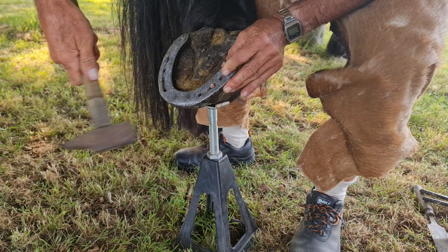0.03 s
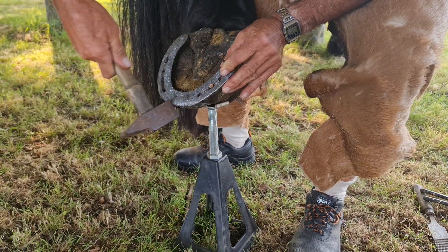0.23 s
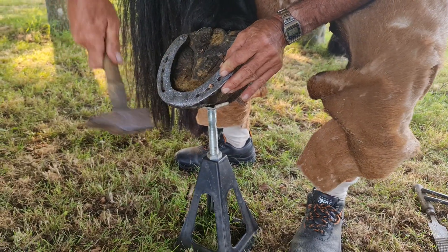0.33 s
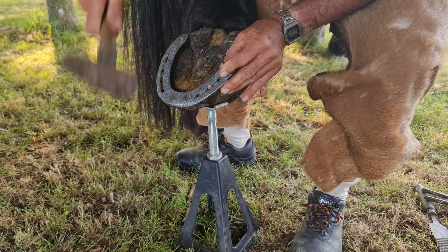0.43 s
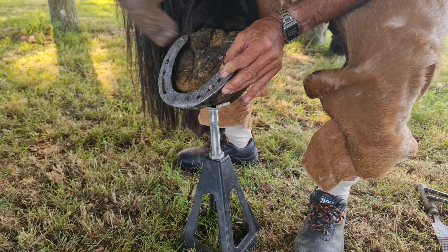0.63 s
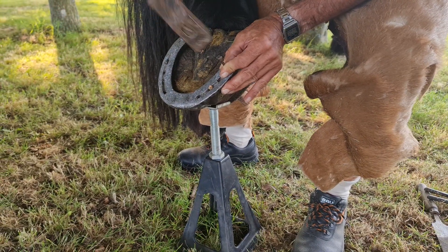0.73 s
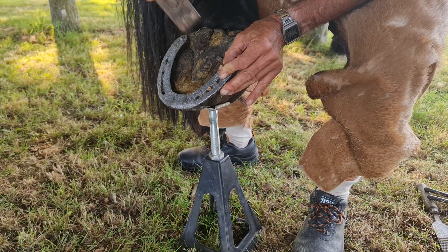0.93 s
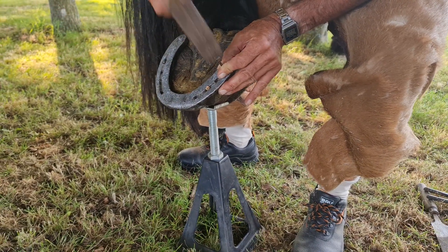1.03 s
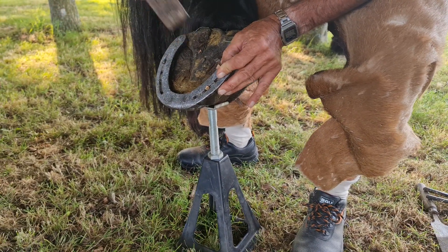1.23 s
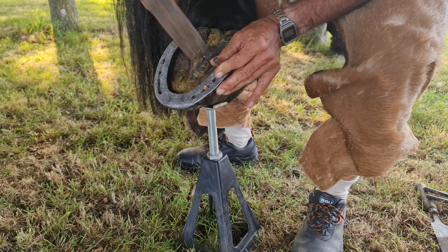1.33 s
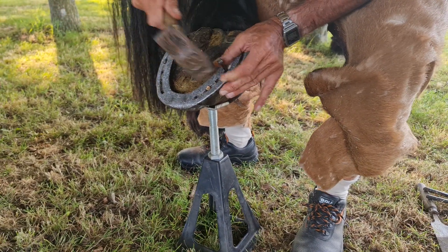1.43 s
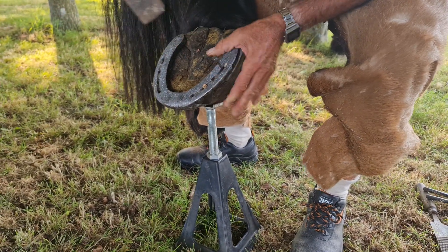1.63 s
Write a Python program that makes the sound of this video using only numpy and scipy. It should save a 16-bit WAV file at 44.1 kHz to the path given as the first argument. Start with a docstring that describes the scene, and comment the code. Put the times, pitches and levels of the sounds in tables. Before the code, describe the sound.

A hammer strikes a steel horseshoe with one sharp, briefly ringing clink. After a pause it gives a dry double tap on a nail, then a dull knock on the hoof, close to the microphone outdoors.

```python
"""Farrier at work on grass

Outdoors, close to the microphone, a shod hoof rests on a stand. As an earlier clink dies away,
the hammer clinks on the steel shoe, gives a dry double tap on a nail, then a dull knock on the hoof.
Trees answer faintly; behind are the hum of a far engine and a thin hiss of insects."""
import sys
import numpy as np
from scipy import signal
from scipy.fft import rfft, irfft
from scipy.io import wavfile
from scipy.ndimage import map_coordinates

SR = 44100
rng = np.random.default_rng(int(sys.argv[2]) if len(sys.argv) > 2 else 0)


def pcm_store(signal):
    """Save signal as 16-bit PCM."""
    levels = np.round(np.clip(np.atleast_2d(signal), -1, 1) * 32767)
    wavfile.write(sys.argv[1], SR, levels.astype(np.int16).T)


N = 74970
T = np.arange(N) / SR
HZ = np.fft.rfftfreq(N, 1 / SR)

CLINK_S, KNOCK_S = 0.2255, 1.437
NOTE_HZ, NOTE_PAN_DB = 6468, -6.5  # the shoe's main note; pan is always left minus right
BLOW_ALIKE, TREES_ALIKE = 0.05, 0.2  # likeness of left and right


def clinks():
    """Steel on steel, close up: a crack, modes choked by the contact, then a weak, rough free ring."""
    # Hammer blows. Each row: start in seconds after the main clink, level in dB,
    # extra gain of the main note in dB, treble loss in dB an octave.
    blows = [(-.35, 3, -10, 6.5), (0, -0.5, -1, -0.5)]
    # Modes of shoe and hammer head. Each row: pitch in Hz, level in dB, pan in dB,
    # t60 in contact in seconds, level of the free ring in dB.
    steel = [(1232, -22.5, -1, 0.03, -56), (2309, -27.5, 1.5, 0.042, -44.5), (2830, -22.5, 9, .028, -44.5),
             (2950, -16.5, 11, 0.025, -45), (3848, -16.5, 9.5, .03, -46), (4566, -13, 1, 0.035, -37),
             (5027, -21, -1.5, .022, -48.5), (6620, -16.5, -5, .028, -38.5), (6720, -10.5, -9.5, 0.03, -46),
             (7680, -33, -2.5, .03, -47), (7990, -28.5, -2, .03, -48), (9690, -21, -9, .017, -49.5),
             (9800, -30.5, -8.5, .02, -51.5), (10900, -31.5, -3.5, 0.042, -53.5),
             (11800, -31, -4, 0.05, -49), (12460, -27.5, 4, 0.096, -42)]
    # The contact's crack. Each row: band in Hz, level in dB, t60 in seconds, pan in dB.
    crack_bands = [(63.6, -37.5, .16, -5), (215, -35.5, 0.046, -1), (465, -43.5, 0.067, 0),
                   (930, -16, 0.031, 0.5), (2000, -16, .018, 10.5), (5260, -15, .022, -2.5),
                   (10100, -26, .02, -4), (14930, -29.5, .012, 3)]
    # Wash of the shoe's many weak modes. Each row: band in Hz, level in dB, t60 in seconds, pan in dB.
    wash_bands = [(700, -62, .15, 0.5), (1300, -47, .22, -1), (2300, -44.5, .28, -1.5),
                  (3085, -42, 0.33, -0.5), (5000, -45.5, .3, -2), (7500, -48, 0.29, -2),
                  (10000, -50, 0.16, -2), (12300, -44.5, 0.19, -0.5), (13240, -72, .15, -2)]
    ring_spectrum = sum(amp(free_db) * cluster(hz) for hz, *_, free_db in steel)
    choked = sum(-(-1) ** k * mode(hz, db, pan_db, t60)
                 for k, (hz, db, pan_db, t60, _) in enumerate(steel))
    out = 0
    for start, db, note_db, loss_db in blows:
        hit = crack(crack_bands, spike=0.31) + choked
        hit += mode(NOTE_HZ, note_db - 6.5, NOTE_PAN_DB, t60=0.067)
        hit += mode(hz=42.6, db=-36.5, pan_db=-5.5, t60=0.077)  # leg and stand shake
        wash = burst(wash_bands, BLOW_ALIKE)
        ring = np.linalg.norm(ring_spectrum) * noise(ring_spectrum) * fade(0.3)
        note = noise(cluster(NOTE_HZ, width_hz=39)) * fade(0.45)
        note *= amp(note_db - 42.5) * pan(NOTE_PAN_DB)
        clink = outdoors(hit, wet_db=-16) + wash + ring + note
        out += amp(db) * at(CLINK_S + start, dulled(clink, loss_db))
    return out


def swell():
    """The ring swells in just ahead of the main clink."""
    # Bands of the swell. Each row: centre in Hz, level in dB, pan in dB, width in octaves.
    bands = [(1150, -45, 11.5, 0.24), (2910, -29.5, 15, 0.11), (4800, -33.5, -10.5, 0.33),
             (6520, -30.5, -15.5, 0.044), (10000, -43.5, -2, 0.25)]
    lead_s = 0.0015
    ring = sum(amp(db) * pan(pan_db) * noise(bell(hz, octaves)) for hz, db, pan_db, octaves in bands)
    rising = (ring * fade(0.04))[:, ::-1]
    return at(CLINK_S - lead_s - N / SR, rising)


def taps():
    """The hammer touches a nail, snaps on it and bounces more softly."""
    # Contacts with the nail. Each row: start in seconds, snap level in dB, hoof thump in dB,
    # the snap's treble loss in dB an octave.
    contacts = [(1.111, -21.5, -22.5, -2.5), (1.1138, -1, -21.5, 1.5), (1.122, -8, -10, 3)]
    # The nail's snap. Each row: band in Hz, level in dB, t60 in seconds, pan in dB.
    snap_bands = [(246, -47, 0.15, -6), (1090, -46.5, 0.11, -1), (2500, -39, 0.03, 3),
                  (3900, -40, 0.054, 8.5), (5300, -32.5, 0.024, -3), (8600, -35, 0.03, -2),
                  (14500, -27, 0.061, -2.5)]
    blows = 0
    for start, db, thump_db, loss_db in contacts:
        snap = amp(db) * dulled(crack(snap_bands, spike=1.53), loss_db)
        blows += at(start, snap + hoof(thump_db, dull_db=5))
    return outdoors(blows, wet_db=-19)


def knock():
    """A firm, dead blow on the hoof barely wakes the shoe and leaves a nail ringing thinly."""
    # The blow's smack. Each row: band in Hz, level in dB, t60 in seconds, pan in dB.
    smack_bands = [(253, -42.5, 0.059, 7), (900, -25.5, 0.027, 4), (2000, -31, 0.033, 8),
                   (3850, -31, 0.031, 6.5), (5140, -27.5, 0.025, -8.5), (8500, -30, 0.021, 3.5),
                   (14560, -26.5, 0.066, -1)]
    blow = crack(smack_bands, spike=1.74) + hoof(db=-2)
    blow += mode(NOTE_HZ, -37.5, NOTE_PAN_DB, t60=0.072)  # the shoe, choked by the hand
    nail = amp(-50.5) * pan(1.5) * noise(cluster(hz=12300)) * fade(0.38)
    return at(KNOCK_S, outdoors(blow, wet_db=-20.5) + nail)


def hoof(db, dull_db=0):
    """The hoof thumps on its stand; a soft blow loses dull_db an octave above the lowest mode."""
    # Modes of hoof and stand. Each row: pitch in Hz, level in dB, pan in dB, t60 in seconds.
    modes = [(97.4, -31.5, 1, 0.2), (201.4, -31.5, 5.5, 0.072), (290, -33.5, -11, 0.057),
             (495, -17.5, 3, 0.038), (564, -25.5, -7.5, 0.031), (745, -22.5, 2, 0.035),
             (1074, -18.5, 16.5, 0.025)]
    lowest_hz = modes[0][0]
    return sum(mode(hz, db + level_db - dull_db * np.log2(hz / lowest_hz), pan_db, t60)
               for hz, level_db, pan_db, t60 in modes)


def rustles():
    """Hand and hammer brush the hoof."""
    # Small brushes. Each row: peak time in seconds, half-length in seconds, centre in Hz,
    # width in octaves, level in dB.
    brushes = [(0.582, 0.0084, 273, 0.32, -61), (.585, 0.0067, 1330, 0.8, -66), (.72, 0.011, 8000, .6, -82),
               (1.206, 0.12, 1020, 0.6, -66.5), (1.213, .06, 407, 0.91, -68.5),
               (1.235, .025, 8950, 0.98, -70), (1.246, .002, 8800, .5, -63), (1.27, 0.21, 5330, 0.9, -79),
               (1.478, .03, 5210, 0.31, -70.5), (1.57, .03, 100.3, 0.23, -61.5),
               (1.623, 0.019, 158, 0.25, -61), (1.7, .035, 6500, 1, -75), (1.7, 0.054, 900, 1, -75)]
    out = 0
    for peak_s, half_s, hz, octaves, db in brushes:
        envelope = np.exp(-((T - peak_s) / half_s) ** 2)
        out += amp(db + 2 * wobble(96)) * envelope * noise(bell(hz, octaves))
    return out


def outdoors(blow, wet_db):
    """A blow, its onset eased, with the scatter of near trees and a faint echo from a far row."""
    # Scatter off trees and ground. Each row: band in Hz, relative level in dB, t60 in seconds, pan in dB.
    trees = [(200, -28.5, .12, 1), (600, -23, .12, -1.5), (1400, -14.5, .22, -1), (2860, -10.5, .22, -12.5),
             (5500, -6.5, 0.28, 3.5), (10500, -4.5, .22, -0.5), (15000, -3, 0.067, -2)]
    onset_s, build_s, echo_s, echo_db = 0.00035, 0.008, 0.235, -35.5
    rise = 1 - np.exp(-(T / build_s) ** 2)
    near = burst(trees, TREES_ALIKE) * rise
    far = at(echo_s, noise(bell(hz=3700, octaves=0.2), TREES_ALIKE) * fade(0.35) * rise)
    tail = near / np.linalg.norm(near[0]) + amp(echo_db) * far / np.linalg.norm(far[0])
    blow = blow * (1 - np.exp(-T / onset_s))
    return blow + amp(wet_db) * signal.fftconvolve(blow, tail, axes=1)[:, :N]


def engine():
    """A far engine hums, wavering in pitch and level as it fades."""
    # Partials of the hum. Each row: pitch in Hz, starting level in dB.
    partials = [(64.6, -58.5), (129.2, -73.5), (196, -82)]
    fall_db_per_s, waver_db = 6, 6
    phase_drift = wobble(25)
    hum = 0
    for hz, db in partials:
        rms = amp(db - fall_db_per_s * T + waver_db * wobble(18))
        hum += rms * np.sqrt(2) * np.sin(2 * np.pi * hz * T + phase_drift * hz / partials[0][0])
    return pan(-1.5) * hum


def air():
    """Still open air: a low rumble under a faint hiss."""
    # Spectrum of the air. Each row: frequency in Hz, relative density in dB.
    spectrum = [(15, -61), (25, -31.5), (45, -5.5), (66, -11), (137, -17), (157, -25), (1130, -39),
                (1330, -37), (3250, -45.5), (4740, -41.5), (5430, -47), (16000, -63)]
    hz, db = np.transpose(spectrum)
    shape = amp(np.interp(np.log(HZ + 1), np.log(hz), db))
    return amp(-65) * pan(-2) * noise(shape, alike=0.23)


def insects():
    """Insects in the background: a narrow, flickering hiss."""
    return amp(-84 + 2.8 * wobble(10)) * pan(-2) * noise(bell(hz=4770, octaves=0.05))


def mode(hz, db, pan_db, t60):
    """One damped sine; high modes reach the microphone's two ports out of step."""
    half_step_rad = 0.75 * np.tanh(hz / 700)
    sides = np.array([[1], [-1]]) + 0.12 * rng.standard_normal((2, 1))
    return amp(db) * pan(pan_db) * fade(t60) * np.sin(2 * np.pi * hz * T + half_step_rad * sides)


def crack(bands, spike):
    """A contact noise whose first instant stands out."""
    return burst(bands, BLOW_ALIKE) * (1 + spike * fade(0.00899))


def burst(bands, alike):
    """A puff of noise whose bands each die at their own speed."""
    centres = np.log([row[0] for row in bands])
    out = 0
    for own, (_, db, t60, pan_db) in zip(np.eye(len(bands)), bands):
        share = np.interp(np.log(HZ + 1), np.r_[centres[0] - 1, centres], np.r_[0, own])
        out += amp(db) * pan(pan_db) * fade(t60) * noise(share, alike)
    return out


def noise(spectrum, alike=0.17):
    """Stereo noise of rms 1 with the given spectrum and left-right likeness."""
    turn = np.arccos(np.clip(alike, -1, 1)) / 2
    mid, side = irfft(rfft(rng.standard_normal((2, N))) * spectrum, N)
    stereo = np.cos(turn) * mid + np.sin(turn) * np.array([side, -side])
    return stereo / np.sqrt(np.mean(stereo ** 2) + 1e-20)


def cluster(hz, width_hz=55):
    """Spectrum of a cluster of close modes, energy 1."""
    shape = 1 / (1 + ((HZ - hz) / width_hz) ** 2)
    return shape / np.linalg.norm(shape)


def bell(hz, octaves):
    """Spectrum of a bell-shaped band."""
    return np.exp(-0.5 * (np.log2((HZ + 1) / hz) / octaves) ** 2)


def dulled(x, loss_db, corner_hz=4000):
    """x losing loss_db an octave above the corner; a negative loss brightens it."""
    hz = np.fft.rfftfreq(2 * N, 1 / SR)
    octaves_above = np.log2(np.hypot(1, hz / corner_hz))
    return irfft(rfft(x, 2 * N) * amp(-loss_db * octaves_above))[:, :N]


def wobble(rate):
    """A smooth random curve, rate knots a second."""
    coarse = T[::64]
    curve = map_coordinates(rng.standard_normal(256), [coarse * rate], mode="mirror")
    return np.interp(T, coarse, curve)


def fade(t60):
    """Exponential decay, 60 dB in t60 seconds."""
    return np.exp(-np.log(1000) * T / t60)


def amp(db):
    """Gain of a level in dB."""
    return 10 ** (np.asarray(db) / 20)


def pan(db):
    """Left and right gains, the left louder by db."""
    return amp(np.array([[db], [-db]]) / 2)


def at(start, x):
    """x placed at start seconds; whatever falls before zero is cut."""
    shift = round(start * SR)
    delay, skip = max(shift, 0), max(-shift, 0)
    return np.pad(x, ((0, 0), (delay, skip)))[:, skip:skip + N]


def scene():
    """The close work and the far background, as they meet at the microphone."""
    return clinks() + swell() + taps() + knock() + rustles() + engine() + air() + insects()


def record(dry):
    """The recorder clips at full scale and keeps nothing above its band limit."""
    top_hz = 16300
    return irfft(rfft(np.clip(dry, -1, 1)) / (1 + (HZ / top_hz) ** 80), N)


dry = scene()
out = record(dry)
pcm_store(out)
```